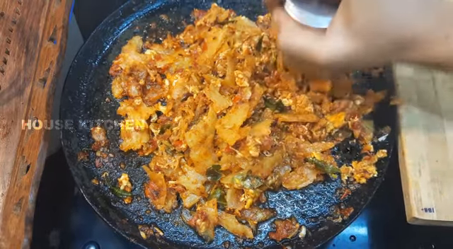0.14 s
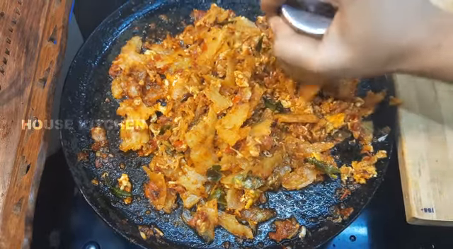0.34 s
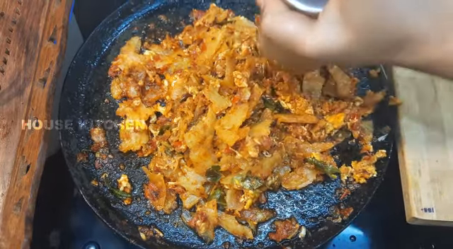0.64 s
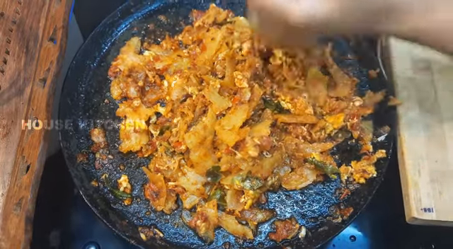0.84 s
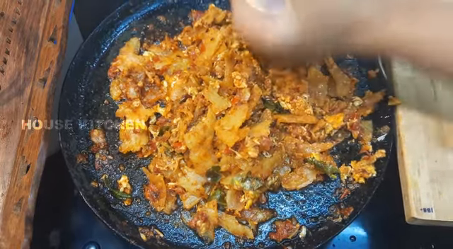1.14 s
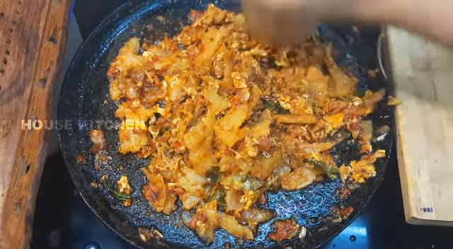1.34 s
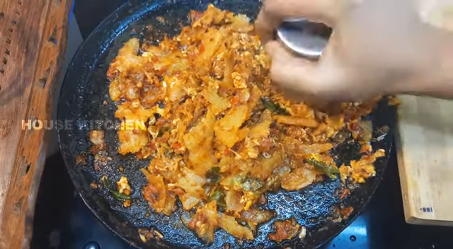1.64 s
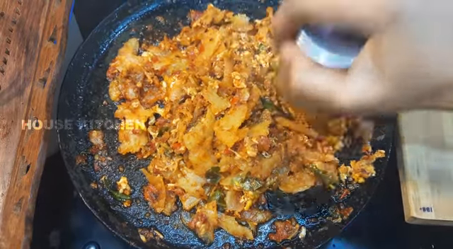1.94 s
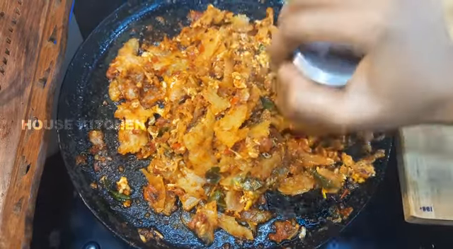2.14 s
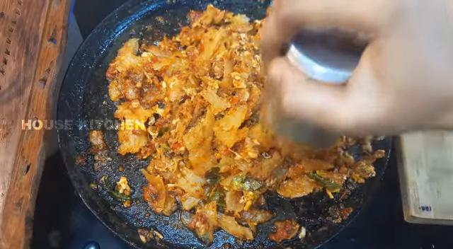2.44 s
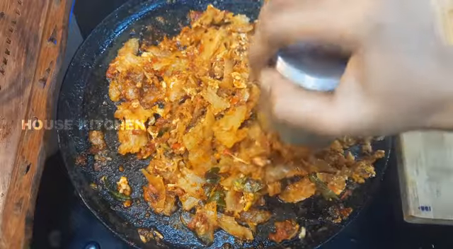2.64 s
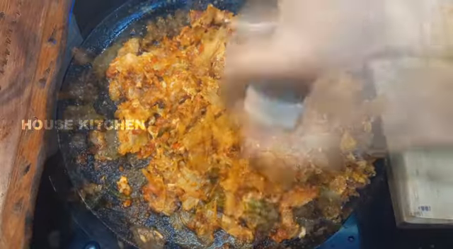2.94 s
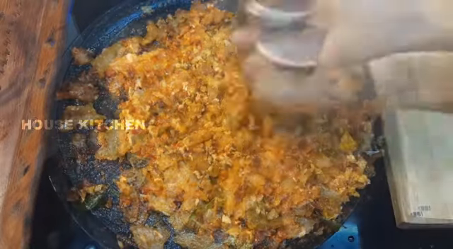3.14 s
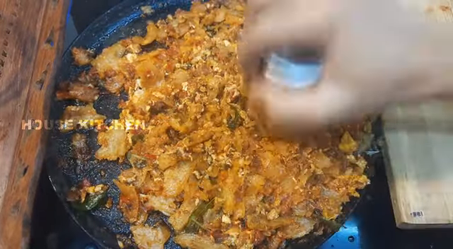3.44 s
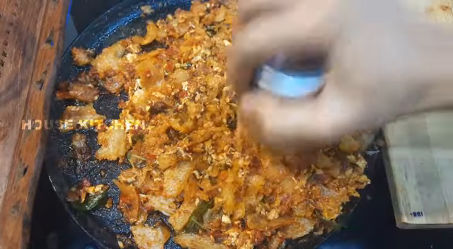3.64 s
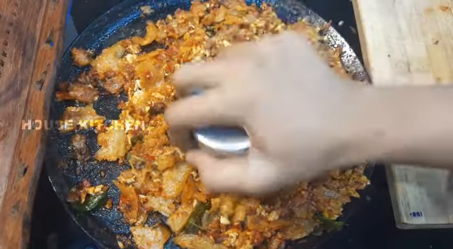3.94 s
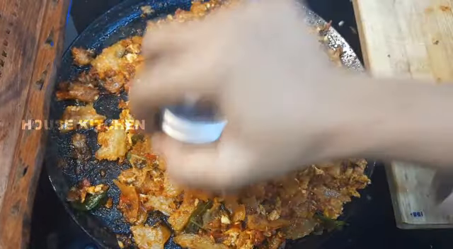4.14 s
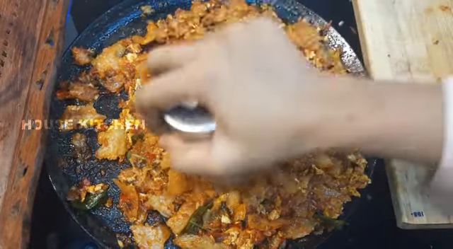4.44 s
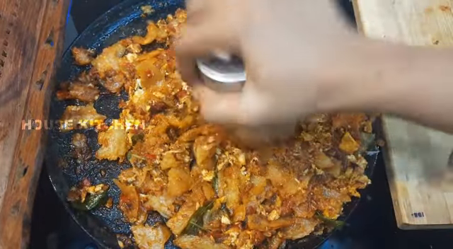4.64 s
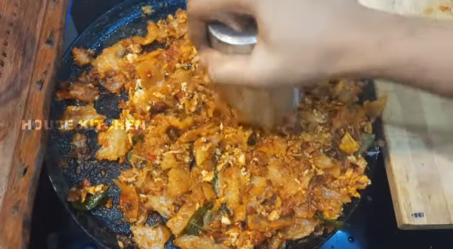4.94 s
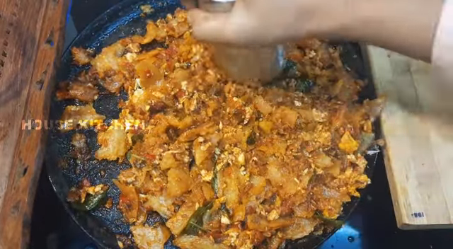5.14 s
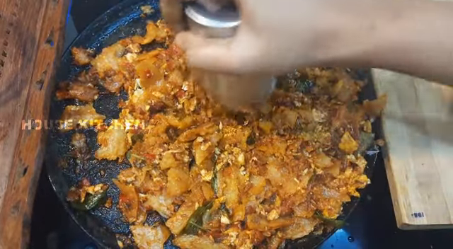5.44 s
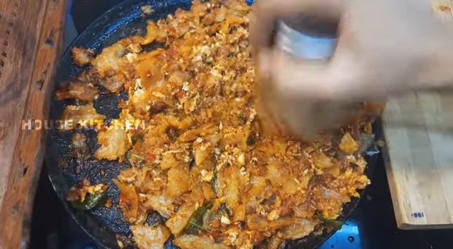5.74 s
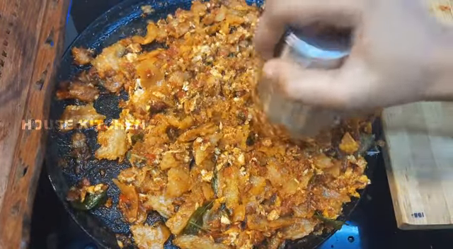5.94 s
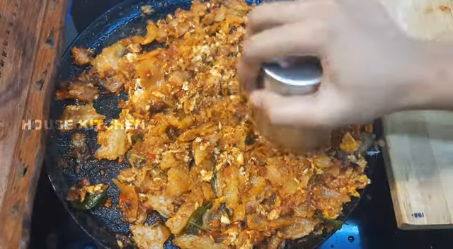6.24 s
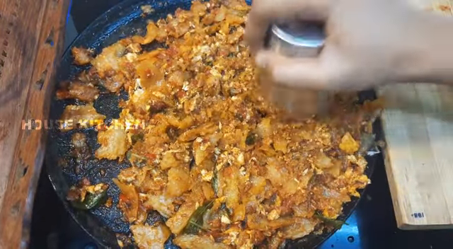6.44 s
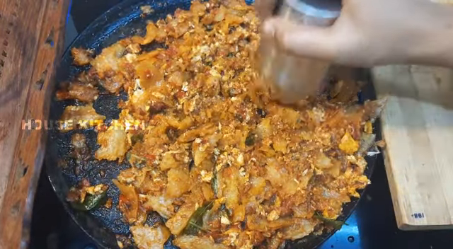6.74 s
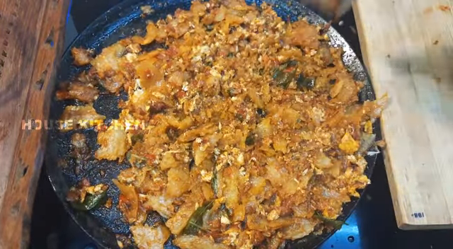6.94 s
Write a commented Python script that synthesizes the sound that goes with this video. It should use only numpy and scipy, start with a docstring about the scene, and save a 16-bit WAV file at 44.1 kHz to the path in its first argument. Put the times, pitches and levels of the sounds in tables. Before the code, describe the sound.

Close up, a steel tumbler's rim strikes an iron griddle through food, about four chops a second. Early blows are crisp, clattering clacks with a brief ring; midway several sink into deep food and turn hollow and squelchy, then hard and soft blows mix before bright ones return. Soft low burner rush and faint sizzle lie underneath, in a lively kitchen.

```python
"""Tumbler chopping on a griddle

A steel tumbler, mouth down, chops food on an iron griddle about four times a second in a hard-walled kitchen.
Where the rim cuts through, filtered impacts and noise clash as steel on iron and a pair of sines rings briefly;
in deep food damped sines pop hollowly and bursts of filtered grains squelch. Each blow booms in the stove and
puffs air at the microphone; a burner rushes softly, oil sizzles faintly, and a limiter holds the peaks."""
import sys
import numpy as np
from scipy import signal
from scipy.fft import rfft, irfft, next_fast_len
from scipy.io import wavfile
from scipy.ndimage import uniform_filter1d, minimum_filter1d

SR = 44100
rng = np.random.default_rng(int(sys.argv[2]) if len(sys.argv) > 2 else 0)


def master(y):
    """Save y as 16-bit WAV."""
    cut = np.clip(np.atleast_2d(y).T, -1, 1)
    pcm = np.round(cut * 32767)  # scale
    wavfile.write(sys.argv[1], SR, pcm.astype(np.int16))


N = 312315
LENGTH = 32768  # samples in each blow
T = np.arange(LENGTH) / SR
HZ = np.fft.rfftfreq(LENGTH, 1 / SR)


def amp(db):
    """Decibels to gain."""
    return 10 ** (np.asarray(db) / 20)


def unit(x):
    """Scaled to rms 1."""
    return x / np.sqrt(np.mean(x ** 2) + 1e-20)


def sized(x, db):
    """A blow with the energy of a twentieth of a second at this rms level."""
    return unit(x) * amp(db) * np.sqrt(SR / 20 / LENGTH)


def fade(t60, t=T):
    """A decay of 60 dB in t60 seconds."""
    return np.exp(-np.log(1000) * t / t60)


def along(points, hz):
    """Reads (f/Hz, value) points on a log frequency axis."""
    f, v = np.transpose(points)
    return np.interp(np.log(hz + 1), np.log(f + 1), v)


def at(curve, s):
    """The columns of a time curve at time s."""
    times, *columns = np.transpose(curve)
    return [np.interp(s, times, column) for column in columns]


def filtered(x, response):
    """x shaped by a function of frequency."""
    padded = next_fast_len(x.shape[-1] + SR // 4)
    spectrum = rfft(x, padded) * response(np.fft.rfftfreq(padded, 1 / SR))
    return irfft(spectrum, padded)[..., :x.shape[-1]]


def causal(gain):
    """The minimum-phase response with this gain: it rings only after the blow."""
    cepstrum = irfft(np.log(gain + 1e-6))
    # double the first half, drop the second, leave time zero alone
    fold = 1 + np.sign(LENGTH / 2 - np.arange(LENGTH)) * (T > 0)
    return np.exp(rfft(cepstrum * fold))


def add(track, s, sound):
    """Mixes a sound into the track from time s, keeping what falls inside."""
    start = round(s * SR)
    track[:, max(start, 0):start + LENGTH] += sound[..., max(-start, 0):max(N - start, 0)]


# How alike the diffuse sound is at left and right: f/Hz, likeness/0-1
STEREO_LIKENESS = [(60, 0.94), (300, 1), (600, 0.65), (1200, 0.16), (3000, 0)]


def diffuse(size):
    """Two noises, alike in the bass and unrelated in the treble, mixed from mid and side."""
    def mid_side_gains(hz):
        turn = np.arccos(np.clip(along(STEREO_LIKENESS, hz), -1, 1)) / 2
        return np.array([np.cos(turn), np.sin(turn)])
    mid, side = filtered(rng.standard_normal((2, size)), mid_side_gains)
    return np.array([mid + side, mid - side])


# Colour of the burner's rush: f/Hz, relative level/dB per Hz
RUSH_COLOUR = [(20, -48), (40, -32), (60, -5), (80, 0.5), (118, 2.5), (165, -3.5), (400, -10), (1000, -37),
               (2000, -24), (5000, -20), (15000, -27)]


def background(rush_db=-53, sizzle_db=-63, spits=500):
    """The burner's soft rush is coloured noise; spitting oil is sparse random ticks, spits per second."""
    rush = unit(filtered(diffuse(N), lambda hz: amp(along(RUSH_COLOUR, hz))))
    ticks = (rng.random((2, N)) < spits / SR) * rng.standard_normal((2, N))
    sizzle = unit(filtered(ticks, lambda hz: hz / (hz + 2500)))
    return amp(rush_db) * rush + amp(sizzle_db) * sizzle


# Decay of the hard-walled kitchen: f/Hz, t60/s
KITCHEN_DECAY = [(35, 0.036), (80, .6), (150, 0.4), (420, 0.67), (1100, 0.55), (2900, 0.51), (7700, 0.4),
                 (15000, 0.31)]


def in_kitchen(sound, build_s=.013):
    """The walls answer with a diffuse tail that swells in, then dies at each pitch's own rate; new each call."""
    hz, t, bands = signal.stft(diffuse(LENGTH), SR, nperseg=256)
    decaying = bands * fade(along(KITCHEN_DECAY, hz)[:, None], t)
    tail = signal.istft(decaying, SR, nperseg=256)[1][:, :LENGTH]
    tail = tail * np.minimum(T / build_s, 1) ** 1.5
    return signal.fftconvolve(np.atleast_2d(sound), unit(tail) / np.sqrt(LENGTH), axes=1)[:, :LENGTH]


def puff(db, depth, pan_db, sub_hz=35):
    """One low push of air from under the tumbler, with its own strength and pitch at each microphone port."""
    port_hz = 99, 140  # left, right on bare iron; full depth of food doubles them
    pushes = []
    for hz in port_hz:
        ratio = HZ / (hz * (1 + depth))
        low_cut = HZ ** 2 / (HZ ** 2 + sub_hz ** 2)
        pushes.append(unit(irfft(causal(ratio / (1 + ratio ** 3.3) * low_cut))))
    return sized(np.array(pushes) * amp(pan_db * np.array([[.5], [-.5]])), db)


def thud(db, attack=0.0068):
    """The stove top booms briefly under the griddle in its one low mode."""
    stove_hz, stove_t60 = 119.9, 0.26  # Hz, s
    return sized(np.sin(2 * np.pi * stove_hz * T) * fade(stove_t60) * (1 - np.exp(-T / attack)), db)


# Modes of the air shut in the tumbler: f/Hz, relative level/dB, t60/s before the seal lengthens it
TRAPPED_AIR = [(396, 0, .052), (750, -8, .04), (1050, -12, .03)]


def pop(db, hardness, attack=0.0053, seal=0.09):
    """The trapped air hums in damped sines, and longer when soft food seals the rim."""
    stretch = 1 + rng.normal(0, 0.017)
    hold = 1 + seal * np.clip(-hardness, 0, 6)
    air = np.zeros(LENGTH)
    for hz, level, t60 in TRAPPED_AIR:
        air += amp(level) * np.sin(2 * np.pi * hz * stretch * T) * fade(t60 * hold)
    return sized(air * (1 - np.exp(-T / attack)), db)


def rim_ring(db, hz, split=0.049, free_hz=2095):
    """The tumbler's oval mode sounds as a close pair of short sines, with a fainter tone that lingers."""
    phase = rng.normal(0, 0.54, (2, 1))
    upper = np.sin(2 * np.pi * hz * T + phase)
    lower = .35 * np.sin(2 * np.pi * hz * (1 - split) * T - phase)
    linger = amp(-29) * np.sin(2 * np.pi * free_hz * T + phase) * fade(.7)
    onset = 1 - np.exp(-T / .0005)
    return sized(((upper + lower) * fade(.048) + linger) * onset, db)


# Broad colour of rim on iron: f/Hz, relative level/dB per Hz
CLASH_COLOUR = [(30, -21), (80, -7), (200, -4), (330, 2.5), (550, 4.5), (850, 2), (1300, 1), (1900, 2.5),
                (2600, -0.5), (3600, -9), (5500, -10), (9000, -15), (10300, -19.5), (15500, -28)]
# Resonances of the tumbler wall: centre f/Hz, width/Hz, level/dB over the clash colour
TUMBLER_WALL = [(2050, 57, -12), (3120, 163, 3.5), (3975, 207, 9), (4980, 68, 4.5), (6520, 110, -1),
                (6810, 74, 3.5), (7900, 140, 2.5), (8940, 130, 4.5), (9380, 180, 1), (11100, 250, 2.5),
                (11970, 510, 6.5), (12450, 140, 3), (14300, 150, 12), (14600, 360, -18)]
# Resonances of the griddle under its load of food: centre f/Hz, width/Hz, level/dB over the clash colour
LOADED_GRIDDLE = [(340, 22, 1), (475, 25, 1), (505, 20, 3), (720, 35, 0), (760, 25, 1), (975, 50, 2),
                  (1070, 30, 3), (1184, 35, 0), (1400, 70, -1), (1660, 70, 1.5)]


def steel_colour(hardness, grip=0.0019):
    """Tumbler and griddle resonances shift with the grip; hardness tilts the treble, dB per octave."""
    hz, width, db = np.transpose(TUMBLER_WALL + LOADED_GRIDDLE)[:, :, None]
    hz = hz * (1 + grip * rng.standard_normal(hz.shape))
    level = amp(db + rng.standard_normal(hz.shape))  # 1 dB of spread
    peaks = level ** 2 / (1 + (2 * (HZ - hz) / width) ** 2)
    tilt_db = hardness * np.log2(np.hypot(1, HZ / 1900))
    colour = amp(along(CLASH_COLOUR, HZ) + tilt_db) * np.sqrt(1 + peaks.sum(0))
    middle = colour[(HZ > 1000) & (HZ < 3500)]
    return colour / np.sqrt(np.mean(middle ** 2))


def clash(db, colour):
    """The rim lands and chatters flat: a click and fading noise drive the griddle and tumbler wall."""
    landing = unit(T == 0)
    chatter = unit(rng.standard_normal((2, LENGTH)) * fade(.02))
    return irfft(rfft(sized(landing + chatter, db)) * causal(colour))


def crack(db, colour, low_hz=900, centre_hz=1700):
    """One edge of the rim lands and the other about a millisecond later, in a spray of tiny contacts."""
    touches = np.zeros(LENGTH)
    touches[0] = -1
    touches[round(SR * rng.uniform(.0006, .0016))] = -.7
    ratio = HZ / centre_hz
    touches = irfft(rfft(touches) * causal(np.sqrt(ratio) / (1 + ratio ** 2)))
    splinters = rng.standard_normal((2, LENGTH)) * fade(.022)
    force = amp(-6) * unit(touches) + unit(splinters)
    small_source = HZ / (HZ + low_hz)  # the thin rim radiates little bass
    return sized(irfft(rfft(force) * causal(colour * small_source)), db)


def buried(depth):
    """How completely food keeps the rim off the iron, 0-1: it still cuts through a thin layer."""
    return np.clip(depth, 0, 1) ** 5.1


# The chops, played here and in squelching: t/s, strength level/dB, depth of food under the rim/0-1,
# puff of air level/dB, puff left minus right/dB
STROKES = [(-0.19, -23, 0, -45, 0), (0.0315, -22, 0.11, -25.5, -12), (0.247, -22.5, 0.2, -43, 27),
           (0.4663, -23, 0.13, -34, -14), (0.688, -21, 0.17, -38.5, 9), (0.924, -21, 0.31, -41.5, 36),
           (1.144, -20.5, 0.19, -28.5, -15), (1.368, -22.5, 0.12, -37, 6), (1.6035, -26, 0.21, -41, 10),
           (1.8144, -24, .17, -41, 13), (2.037, -23, 0.04, -32.5, -16), (2.2665, -24.5, .02, -36.5, -14),
           (2.4969, -25, .02, -29, -2.5), (2.739, -33, 0.82, -48, 1), (2.9596, -21, 0.09, -30, -7),
           (3.2422, -22.5, 0.07, -34.5, 9), (3.4712, -22, 0.46, -53, 2), (3.7002, -25.5, 0.54, -58, 0),
           (3.94, -17.5, 0.89, -46, -2), (4.191, -20, 0.96, -46, -7), (4.4203, -19.5, 0.18, -39, 16),
           (4.66, -20.5, 0.86, -42, 3), (4.8742, -20.5, 0.08, -35.5, 19), (5.1027, -18, 0.27, -45, 18),
           (5.342, -25.5, 0.91, -46, -2), (5.554, -20, 0.22, -45, 9), (5.7811, -28, 0.74, -54, -5),
           (5.9917, -23, 0.45, -41, -10), (6.2116, -23, 0.19, -38, -2), (6.454, -24.5, 0.3, -38, -2),
           (6.681, -24.5, 0, -42, 12)]
# Wet food's colour: f/Hz, relative level/dB per Hz
WET_COLOUR = [(100, -42.5), (270, 4), (500, -4.5), (1000, 10.5), (1500, -0.5), (2200, -4), (4000, -15.5),
              (8000, -21.5), (15000, -25.5)]


def squelching(bursts=1500, spread=0.66, flutter_db=4.5, room_db=3):
    """After each stroke wet food squirts from under the rim in an uneven swell of tiny bursts, per second."""
    base_db, buried_rise_db = -20, 13  # relative to the strength, rise when buried
    peak_s, half_s = 0.049, 0.039  # from blow to peak, half length
    track = np.zeros((2, N))
    for s, strength_db, depth, *_ in STROKES:
        grains = (rng.random(LENGTH) < bursts / SR) * rng.standard_normal(LENGTH)
        grains = grains * rng.lognormal(0, spread, LENGTH)
        mush = unit(irfft(rfft(grains) * causal(amp(along(WET_COLOUR, HZ)))))
        flutter = unit(uniform_filter1d(rng.standard_normal(LENGTH), size=400))
        spurts = amp(flutter_db * flutter)
        swell = np.exp(-((T - peak_s) / half_s) ** 2)
        level = amp(strength_db + base_db + buried_rise_db * buried(depth))
        squelch = level * mush * spurts * swell
        add(track, s, squelch + amp(room_db) * in_kitchen(squelch))
    return track


# The tumbler's ring as the hand moves from the griddle's edge into the heap and back:
# t/s, level/dB over the clash before food chokes it, f/Hz
RING_CURVE = [(0, 3.5, 2040), (.25, 8.5, 2050), (.92, 1, 2052), (1.37, 6.5, 2090), (1.81, 6, 2050),
              (2.5, 1, 2087), (3.24, -4, 2056), (3.7, 5, 1560), (4.42, 1.5, 2016), (4.87, -0.5, 2030),
              (5.1, 3, 2060), (6.21, -3, 2092), (6.68, 5.5, 2050)]
# How well the food seals the rim: t/s, hollow pop level/dB relative to the strength
SEAL_CURVE = [(0, -11), (.69, -28), (1.6, -2.5), (2.5, -25), (2.96, -10.5), (3.94, -9.5), (4.66, -2),
              (4.87, -10), (5.55, -9), (5.78, -4.5), (5.99, -20), (6.68, -36)]
# How hard the blows shake the stove: t/s, thud level/dB relative to the strength
STOVE_CURVE = [(0, -22), (2.5, -23.5), (3.7, -26.5), (4.87, -28.5), (5.55, -38), (5.99, -15), (6.68, -20)]


def chopping(clash_room_db=11.5, ring_room_db=-4, crack_room_db=-10, low_room_db=-8):
    """Every stroke drives steel, stove and trapped air at once; the wide griddle is heard through the room."""
    cushion_db = 17  # clash lost at full depth
    bare_tilt_db, food_tilt_db = 4, 9.5  # treble per octave on bare iron, its fall at full depth
    crack_db, choke_full_db = 4.5, 37  # crack over the strength, crack and ring lost when buried
    track = np.zeros((2, N))
    for s, strength_db, depth, puff_db, pan_db in STROKES:
        ring_db, ring_hz = at(RING_CURVE, s)
        seal_db, = at(SEAL_CURVE, s)
        stove_db, = at(STOVE_CURVE, s)
        hardness = bare_tilt_db - food_tilt_db * depth
        clash_db = strength_db - cushion_db * depth
        choke_db = choke_full_db * buried(depth)
        colour = steel_colour(hardness)
        edge = crack(strength_db + crack_db - choke_db, colour)
        ring = rim_ring(clash_db + ring_db - choke_db, ring_hz)
        low = puff(puff_db, depth, pan_db)
        low = low + thud(strength_db + stove_db) + pop(strength_db + seal_db, hardness)
        # the clash goes only to the room
        outward = amp(clash_room_db) * clash(clash_db, colour) + amp(crack_room_db) * edge
        outward = outward + amp(ring_room_db) * ring + amp(low_room_db) * low
        add(track, s, edge + ring + low + in_kitchen(outward))
    return track


def scene():
    """Strokes and squelches over the burner and sizzle."""
    return chopping() + squelching() + background()


# Unlike colour of the two microphone ports: f/Hz, left minus right level/dB
PORT_COLOUR = [(60, 1), (150, -0.5), (380, -1.5), (900, -1), (2400, 0.8), (4000, -0.5), (6000, -4.5),
               (9000, 4.5), (15000, 7)]


def record(dry, ceiling=0.8, top_hz=15900):
    """Two ports of unlike colour, a quick limiter and the band limit."""
    x = filtered(dry, lambda hz: amp(along(PORT_COLOUR, hz) * np.array([[.5], [-.5]])))
    needed = np.minimum(1, ceiling / (np.abs(x).max(0) + 1e-9))
    gain = uniform_filter1d(minimum_filter1d(needed, size=61), size=45)
    return filtered(x * gain, lambda hz: np.clip((top_hz - hz) / 300 + .5, 0, 1))


dry = scene()
out = record(dry)
master(out)
```